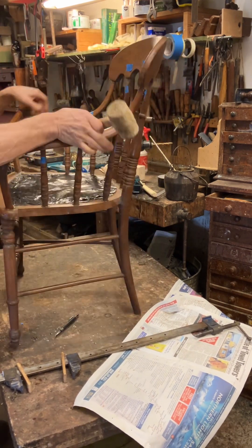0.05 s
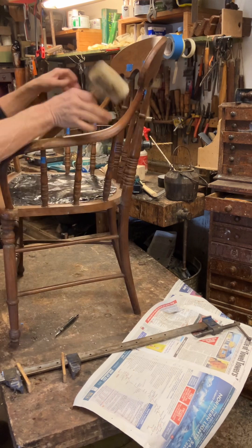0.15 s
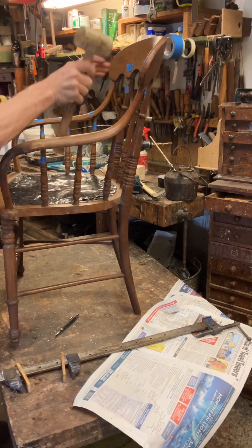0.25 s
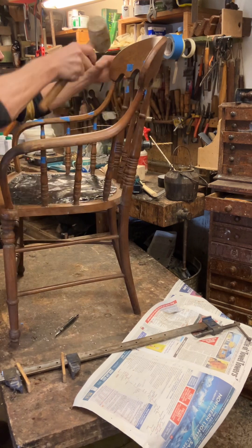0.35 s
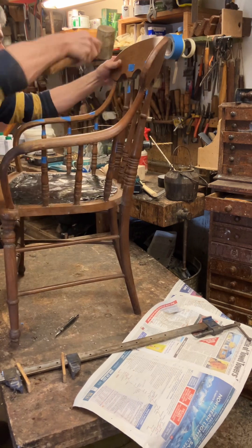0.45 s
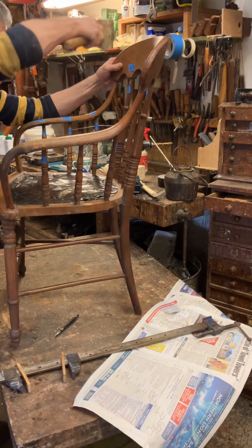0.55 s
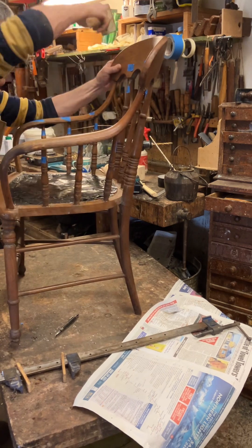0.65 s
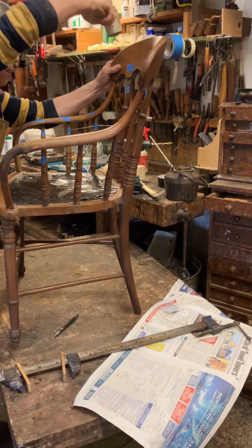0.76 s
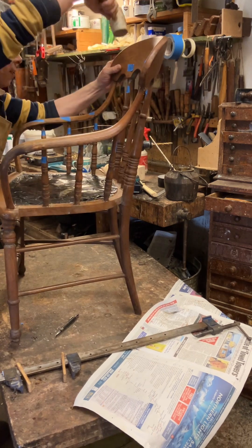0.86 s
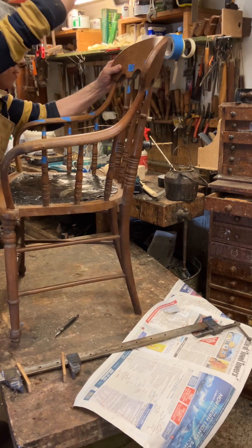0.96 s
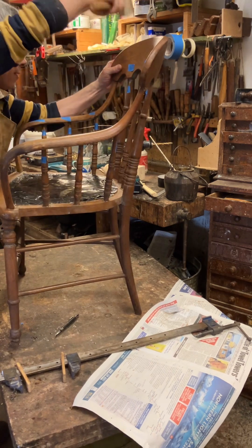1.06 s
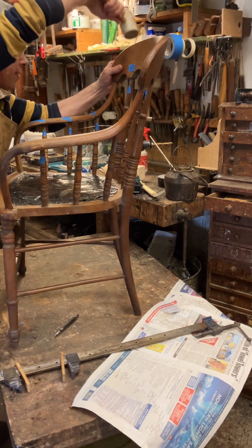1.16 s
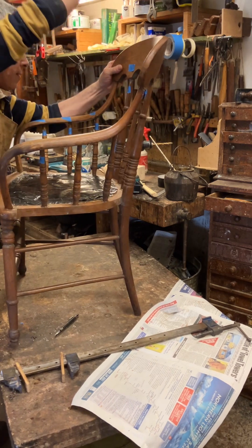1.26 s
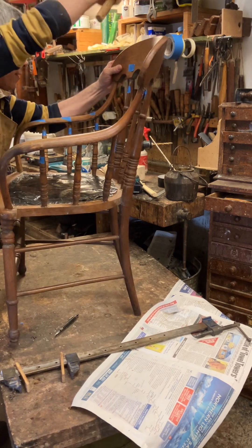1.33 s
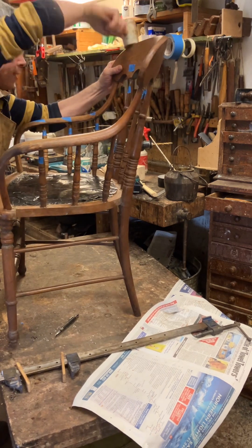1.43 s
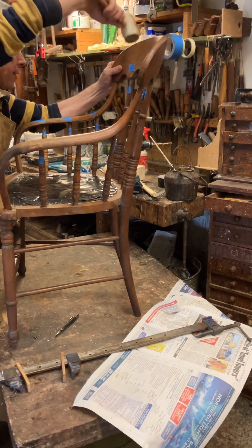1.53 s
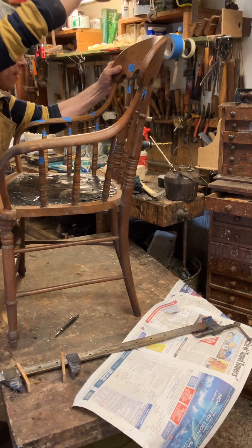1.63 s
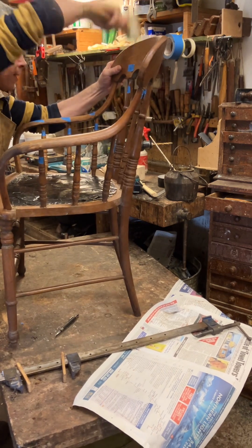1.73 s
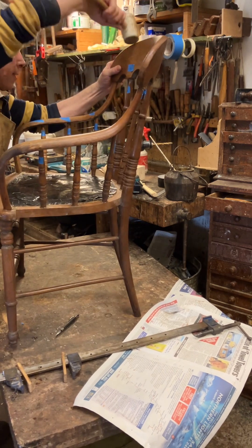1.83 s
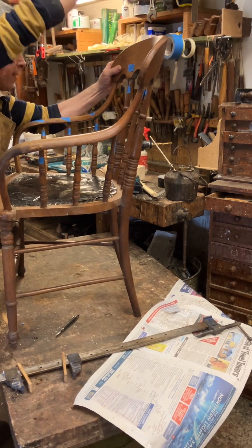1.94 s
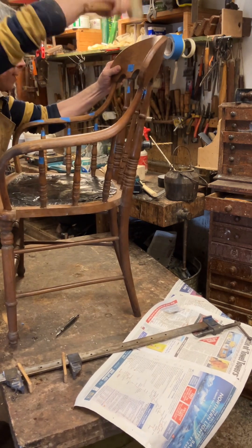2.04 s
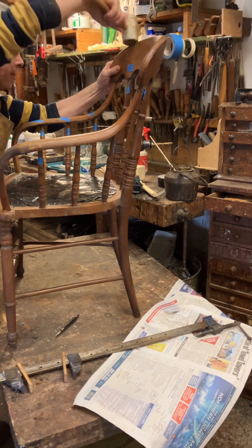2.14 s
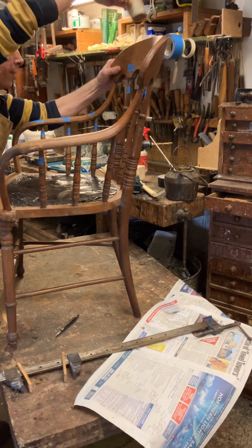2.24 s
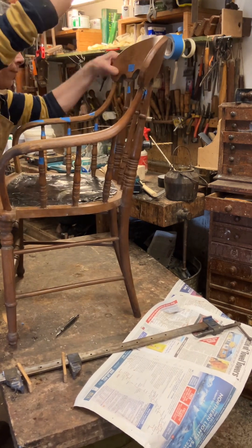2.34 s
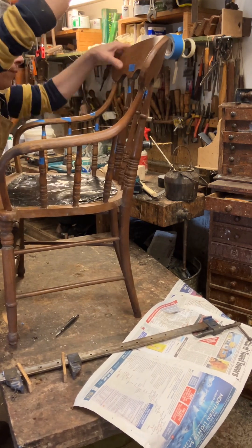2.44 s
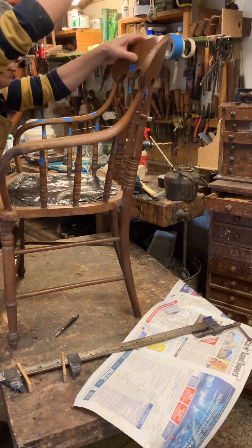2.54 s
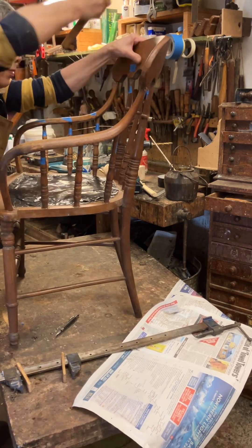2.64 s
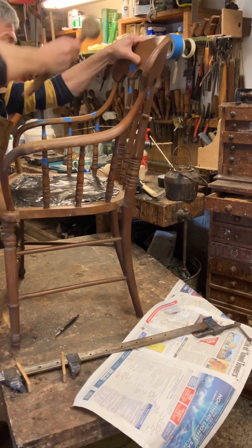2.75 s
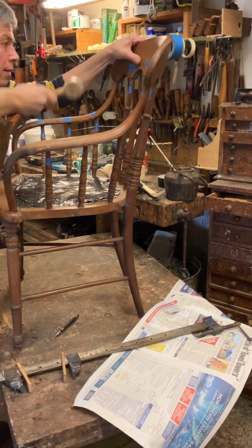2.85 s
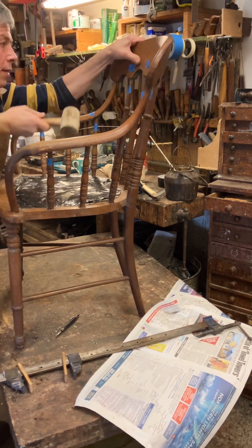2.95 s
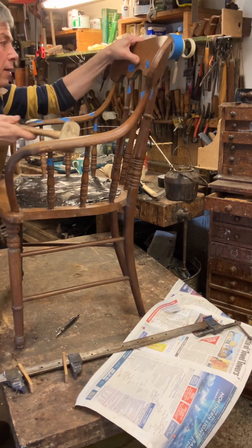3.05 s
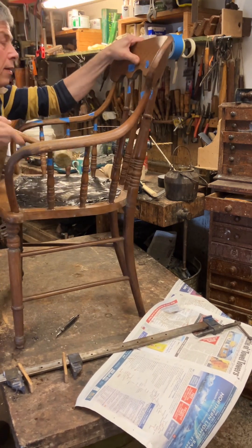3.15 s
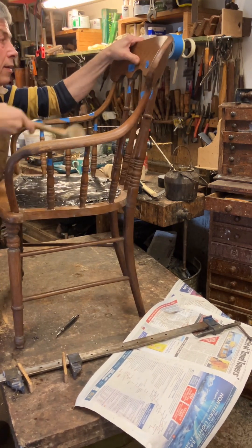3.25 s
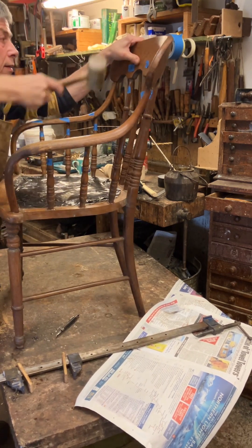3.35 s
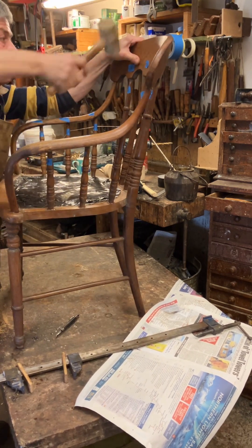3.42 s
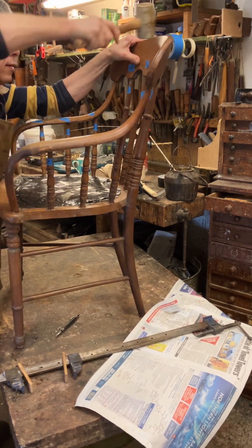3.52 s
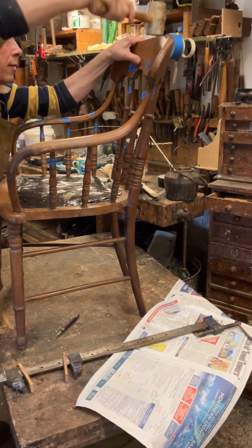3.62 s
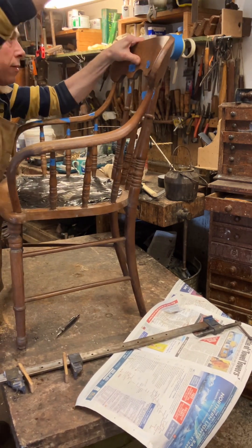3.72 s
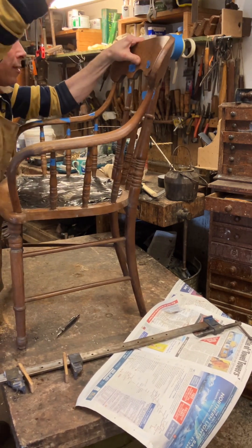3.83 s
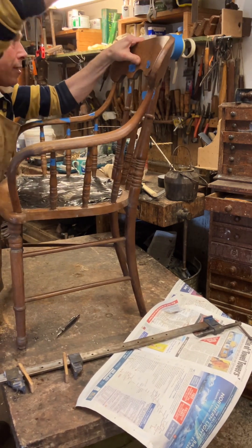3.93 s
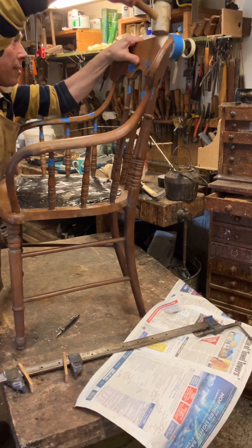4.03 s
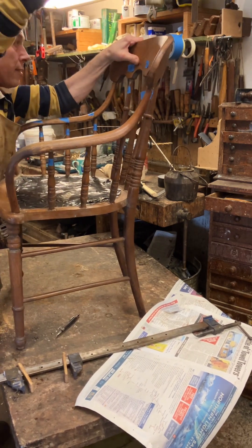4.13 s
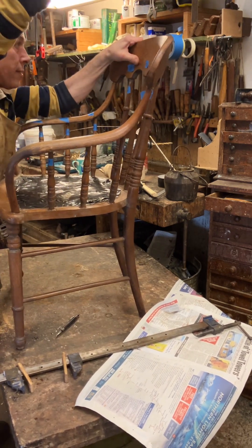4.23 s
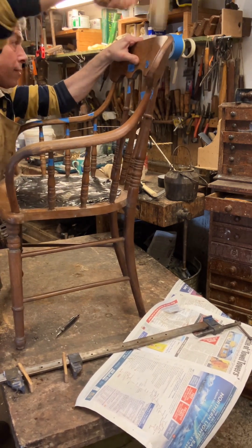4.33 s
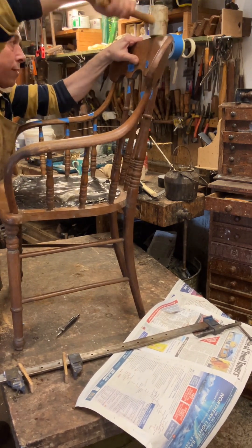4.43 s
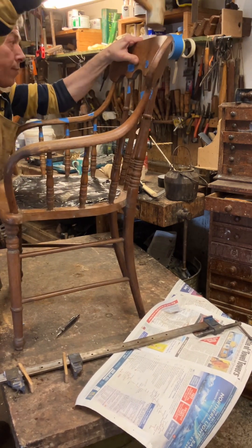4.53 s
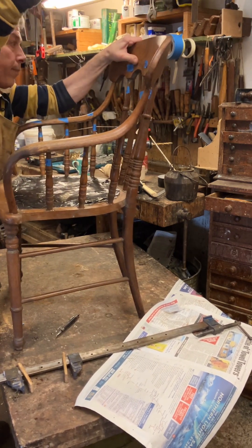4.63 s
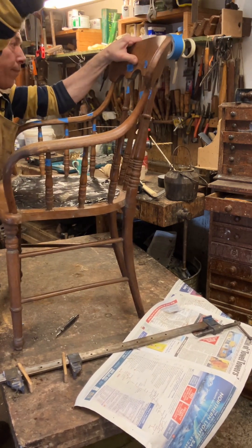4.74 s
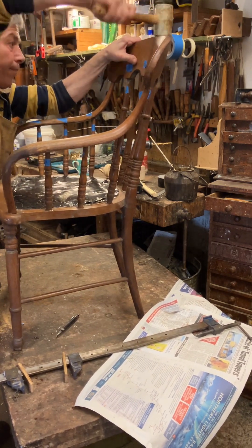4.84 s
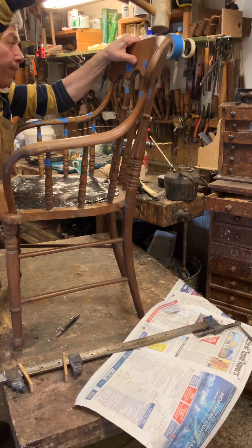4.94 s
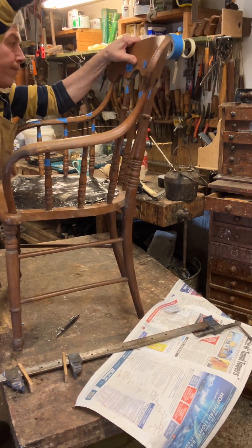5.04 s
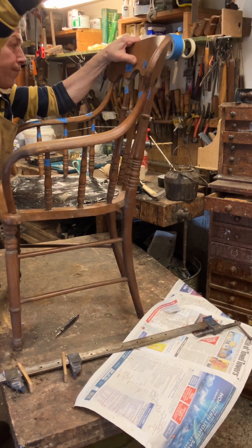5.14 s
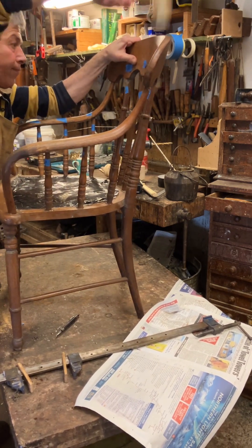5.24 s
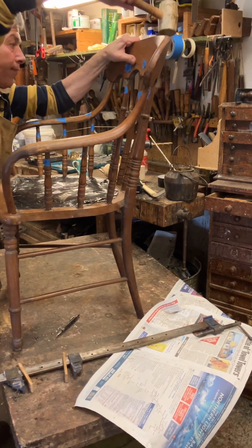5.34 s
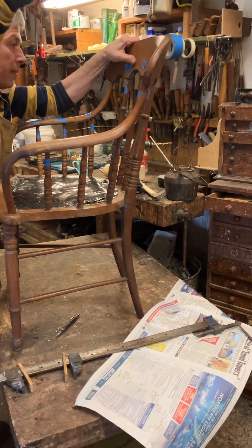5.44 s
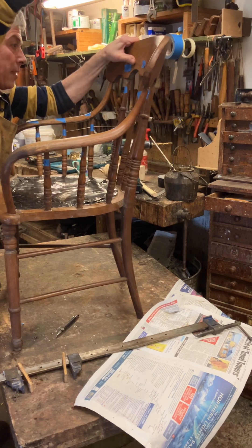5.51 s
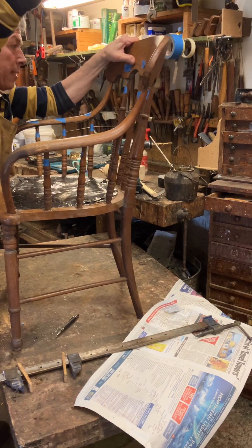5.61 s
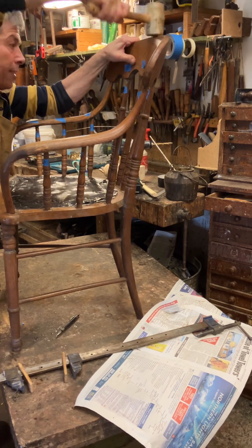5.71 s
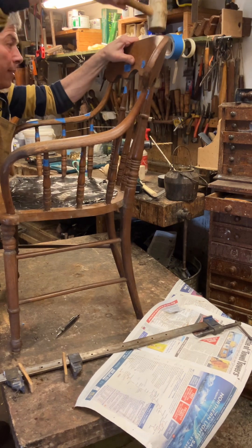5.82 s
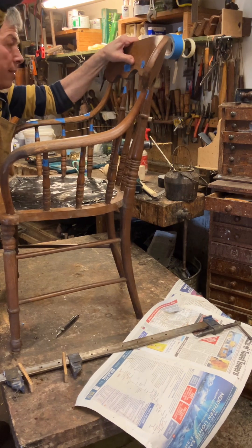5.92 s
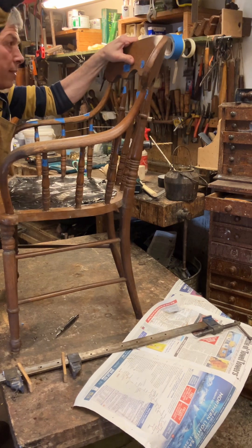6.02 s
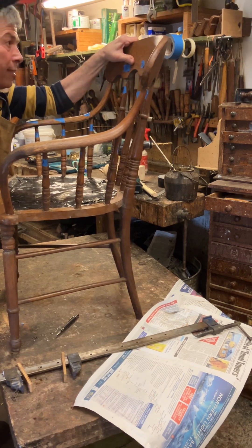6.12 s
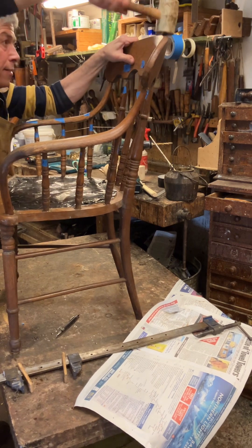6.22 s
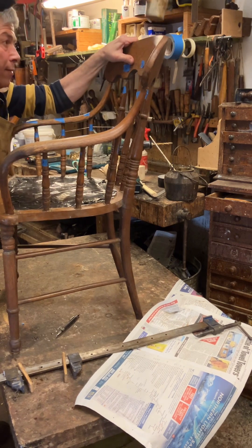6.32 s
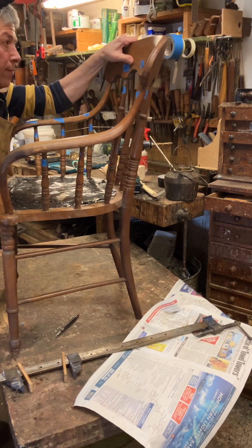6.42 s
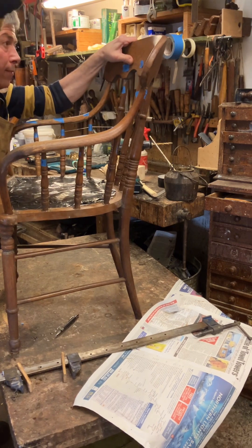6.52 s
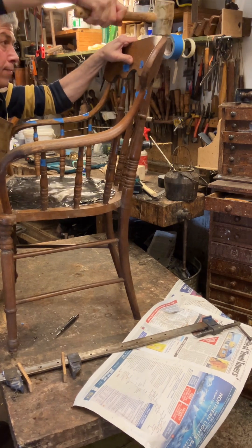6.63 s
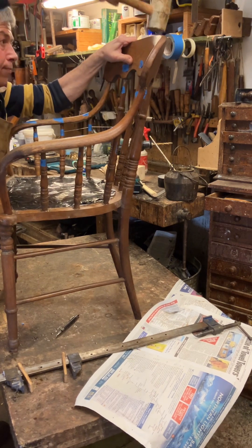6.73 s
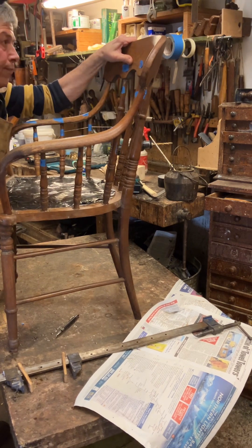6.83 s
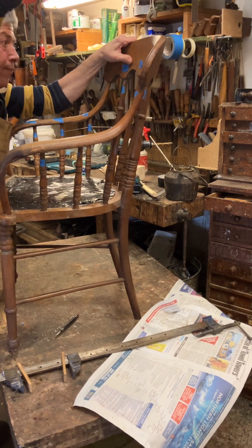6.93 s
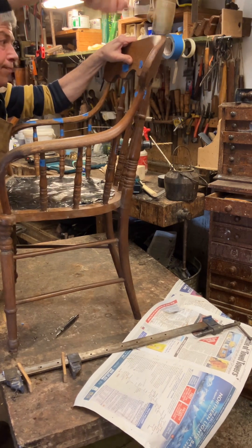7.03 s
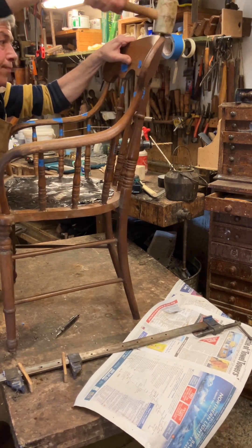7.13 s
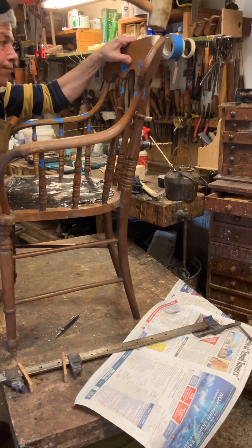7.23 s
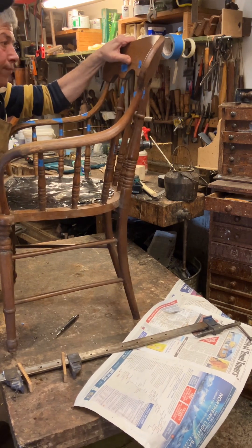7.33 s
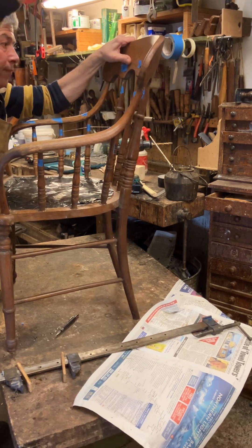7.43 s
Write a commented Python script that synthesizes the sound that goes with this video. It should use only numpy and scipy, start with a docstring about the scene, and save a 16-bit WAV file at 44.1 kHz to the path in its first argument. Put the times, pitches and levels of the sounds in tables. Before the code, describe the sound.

After a faint rustle of sleeves and hands on wood, a wooden mallet strikes a chair frame four times in quick succession, with a brief joint squeak at the last blow. A short pause holds soft shuffling, tiny clicks and one light tap. Eight slower, even blows follow. Each hollow knock buzzes loose spindles, thumps the workbench and rattles metal tools, heard close up in a small workshop.

```python
"""Mallet on a chair back

A wooden mallet knocks on a chair that stands on a workbench in a small, crowded workshop. Each blow
rings the frame, buzzes the loose spindles, booms in the bench and shakes metal tools. In the pauses
sleeves rustle, hands rub on wood and a dry joint squeaks, all over a faint hush."""
import sys
import numpy as np
from scipy import signal
from scipy.fft import rfft, irfft
from scipy.io import wavfile
from scipy.ndimage import uniform_filter1d

SR = 44100
rng = np.random.default_rng(int(sys.argv[2]) if len(sys.argv) > 2 else 0)


def dump(signal):
    """Clip the signal to [-1, 1] and save it as 16-bit WAV at the path in sys.argv[1]."""
    limited = np.clip(np.atleast_2d(signal).T, -1, 1)
    pcm = np.round(limited * 32767).astype(np.int16)
    wavfile.write(sys.argv[1], SR, pcm)


N = 329427

# The low modes of the workbench. Each row: pitch in Hz, level in dB, time to fall 60 dB in seconds.
BENCH = [(83, -8.5, 0.15), (99.35, -4, 0.21), (109.2, -3, 0.23), (157.3, 6.5, 0.12), (165.6, -6, 0.3),
         (182.3, -8, 0.23), (208.8, -9.5, 0.25), (244.4, -3.5, 0.2), (269, -6, 0.14), (307.6, -2, 0.18),
         (347.7, -4, 0.2), (375, -2.5, 0.19), (421.8, -3.5, 0.17)]
# The colour of a dry crack. Each row: frequency in Hz, spectral level in dB.
CRACK = [(1500, 6.5), (3000, -2.5), (4500, -2), (6000, -1.5), (9000, -7), (12000, -9), (15500, -13.5)]


def blows():
    """Mallet hits in four stems: frame knock, crack and tool rattle, close detail, bench boom."""
    # Each row: start in seconds, strength in dB, hardness in dB, crack, tool rattle and thwack in dB,
    # nominal thwack pitch in Hz, thwack hold in seconds, first contact in dB.
    # Crack, rattle, thwack and contact are relative to strength.
    hits = [(1.094, -2.5, 4.5, -19, -33.5, -20.5, 875, .005, -25),
            (1.419, -2.5, 4.5, -15.5, -23.5, -7, 1009, .008, -17),
            (1.742, -2, 1.5, -18, -29, -15.5, 907, 0.0069, -22.5),
            (2.0598, -2, 0, -16.5, -24, -11.5, 869, 0.0068, -22.5),
            (3.576, -31, 12, -18.5, -20.5, -14, 1300, .004, -41.5),
            (3.9647, -2, 2.5, -21, -15, -9, 1010, 0.0048, -29),
            (4.3753, -0.5, -9, -20.5, -17, -13, 983, 0.0055, -33),
            (4.807, -1.5, 5.5, -19, -19.5, -18, 856, 0.0055, -14),
            (5.252, -1.5, -4, -17, -18.5, -15.5, 858, 0.0046, -24),
            (5.7037, -2.5, 3.5, -14.5, -22.5, -14.5, 840, 0.0054, -20),
            (6.16, -4.5, -8.5, -20, -12, -16.5, 797, 0.0072, -21.5),
            (6.604, -4.5, 9, -10.5, -17.5, -9, 1100, 0.0045, -3.5),
            (7.0684, -1.5, -0.5, -16.5, -18, -13, 1180, 0.0079, -19.5)]
    wood, air, near, boom = np.zeros((4, N))
    slips = dict(rough_db=3, rise_s=.0009)  # the joint gives in several small slips
    boom_follows = .61  # the bench follows strength only in part: light blows sound boomier
    for start, db, hard_db, crack_db, rattle_db, thwack_db, hz, hold_s, contact_db in hits:
        contact = burst(.002)
        contact *= attack(np.arange(len(contact)) / SR, .0005)
        add(near, start, gain_of(db + contact_db) * contact)
        body_start = start + .0015  # the wood answers just after the first contact
        add(wood, body_start, gain_of(db - 6.5) * frame_knock(hard_db))
        add(near, body_start, gain_of(db + thwack_db) * thwack(hz, hold_s, fall_s=.00614))
        add(air, body_start, gain_of(db + crack_db) * burst(.0047, **slips))
        add(near, body_start, gain_of(db + crack_db + 1) * burst(.0052, **slips))  # close, dry snap
        add(near, body_start, gain_of(db - 26.5) * spindle_buzz())
        bench_start = start + .003976  # the blow travels down the legs
        add(boom, bench_start, gain_of(boom_follows * db - 19.5) * bench_boom())
        add(air, start + .012, gain_of(db + rattle_db) * tool_rattle())
    return wood, air, near, boom


def frame_knock(hard_db):
    """The chair frame rings briefly; a harder contact reaches the upper modes."""
    # The modes of the frame. Each row: pitch in Hz, level in dB.
    chair = [(455, -4.5), (500, 3), (590, 2), (690, 3), (785, 3), (890, 2), (1040, -1.5), (1180, -0.5),
             (1370, -7.5), (1575, -6), (1800, -12), (1980, -4.5), (2200, 1.5), (2420, 2.5), (2700, -3.5),
             (3000, -18.5), (3400, -26), (3900, -4), (4400, -17)]
    ring_cycles = 10  # wood loses 60 dB in this many cycles
    modes = [(hz, db, ring_cycles / hz) for hz, db in chair]
    upper = np.clip(np.log2(np.array(chair)[:, :1] / 700), 0, 1)
    knock = ring(modes, spread_db=1, detune=.015, lift_db=upper * hard_db)
    return knock * attack(np.arange(len(knock)) / SR, .0008)


def thwack(hz, hold_s, fall_s):
    """Bending waves in the rail: the highs arrive first, so the pitch dives within a few cycles."""
    # Levels of harmonics 2 to 4 in dB against the fundamental.
    overtones_db = [-8, -13, -17]
    t = np.arange(2000) / SR
    phase = 2 * np.pi * np.cumsum(hz * (.5 + .892 * np.exp(-t / fall_s))) / SR
    wave = np.sin(phase)
    for harmonic, db in enumerate(overtones_db, 2):
        wave += gain_of(db) * np.sin(harmonic * phase + 2 * np.pi * rng.random())
    uneven = 1 + .3 * wander(len(t), 40)
    release = np.exp(-np.maximum(t - hold_s, 0) / .002)
    return wave * uneven * attack(t, .0007) * release


def burst(fall_s, size=2048, rough_db=0, rise_s=1e-5):
    """A crack of many tiny contacts: short, uneven and dying, with a smooth colour."""
    t = np.arange(size) / SR
    colour = gain_of(read(CRACK, np.fft.rfftfreq(size, 1 / SR)))
    uneven = gain_of(rough_db * wander(size, 40))
    fade = np.exp(-t / fall_s) * attack(t, rise_s)
    crack = rng.standard_normal(size)
    for _ in range(6):  # impose envelope and colour in turn: no holes or peaks in the spectrum
        phase = np.angle(rfft(crack * fade * uneven))
        crack = evened(irfft(colour * np.exp(1j * phase), size))
    crack *= t < fall_s * np.log(1000)  # gate where the fade is 60 dB down
    return crack * np.linalg.norm(fade) / np.linalg.norm(crack)


def spindle_buzz():
    """Thin spindles and rungs ring on after the frame, rough because they sit loose in their holes."""
    # Each row: pitch in Hz, level in dB, time to fall 60 dB in seconds.
    spindles = [(484, 2, .2), (715, -1, .3), (775, 0, .42), (888, -2, .35), (980, -4, .42), (1044, -1, .3),
                (1150, -4, .45), (1185, -5, .3), (1370, -7, .25), (1575, -11, .2), (2410, -14, .22),
                (4357, -16, .35)]
    tone = ring(spindles, spread_db=1.4, detune=.0021)
    buzz = gain_of(5 * (wander(len(tone), 500) - 1))
    return tone * buzz * attack(np.arange(len(tone)) / SR, .0014)


def bench_boom():
    """The bench takes the blow: its low modes swell in and die away."""
    boom = ring(BENCH, spread_db=1, detune=.0038)
    return boom * attack(np.arange(len(boom)) / SR, .0025) ** 2


def tool_rattle():
    """Loose metal tools knock together: a clatter with a flickering jingle under it."""
    # The modes of the tools. Each row: pitch in Hz, level in dB, time to fall 60 dB in seconds.
    tools = [(3290, -6, .025), (3900, -2, .025), (4357, -9, .06), (4640, -5, .025), (6230, 6, .01),
             (6720, -4, .02), (7600, -3, .015), (8520, -4, .02), (8950, -3, .015), (9320, -8, .04),
             (13415, -6, .06), (14500, -12, .03)]
    jingle = ring(tools, spread_db=2.5, detune=.003)
    t = np.arange(len(jingle)) / SR
    rattle = jingle * gain_of(3 * wander(len(t), 250) - 12)
    add(rattle, 0, burst(.0067, rough_db=4))
    return rattle * attack(t, .003)


def squeaks():
    """Fast, uneven stick-slip in a dry joint: a high tone that sags, then steps up late."""
    # Each row: start and length in seconds, pitch in Hz, opening and closing level in dB,
    # late step up and wobble as shares of the pitch.
    creaks = [(0, 0.12, 3700, -59.5, -76, 0.012, 0.019), (1.898, 0.175, 3658, -42.5, -33, 0.039, 0.0059)]
    # Levels of harmonics 2 to 4 in dB against the fundamental.
    overtones_db = [-24, -24, -29]
    sag, step_at, step_width = .055, .72, .025  # share of pitch per length; two shares of length
    out = np.zeros(N)
    for start, length, top_hz, from_db, to_db, step, wobble in creaks:
        progress = np.arange(0, length, 1 / SR) / length
        size = len(progress)
        step_up = step / (1 + np.exp((step_at - progress) / step_width))
        hz = top_hz * (1 - sag * np.minimum(progress, step_at) + step_up)
        phase = 2 * np.pi * np.cumsum(hz * (1 + wobble * wander(size, 150))) / SR
        tone = np.sin(phase) + sum(gain_of(db) * np.sin(k * phase) for k, db in enumerate(overtones_db, 2))
        level_db = from_db + (to_db - from_db) * progress + 2.2 * wander(size, 150)
        add(out, start, gain_of(level_db) * tone * signal.windows.tukey(size, .1))
    return out


def bumps():
    """Soft contact with the bench: only its low modes speak."""
    # Each row: start in seconds, strength in dB, tilt above 170 Hz in dB per octave.
    nudges = [(0, -48.5, -13), (0.489, -40.5, -7.5)]
    out, t = np.zeros(N), np.arange(SR // 2) / SR
    octaves = np.maximum(np.log2(np.array(BENCH)[:, :1] / 170), 0)
    for start, db, tilt_db in nudges:
        thud = ring(BENCH, spread_db=1.58, detune=.012, lift_db=tilt_db * octaves)
        add(out, start, gain_of(db) * thud * attack(t, .0006))
    return out


def ticks():
    """Tiny dry snaps: a pinch of tone in a puff of noise."""
    # Each row: start in seconds, level in dB, pitch in Hz.
    snaps = [(1.029, -75, 14700), (2.4613, -47, 7860), (2.6797, -57.5, 8700), (2.835, -49, 4300)]
    out, t = np.zeros(N), np.arange(400) / SR
    for start, db, hz in snaps:
        snap = .35 * np.sin(2 * np.pi * hz * t) + .82 * noise(CRACK, len(t))[0]
        add(out, start, gain_of(db) * snap * attack(t, .0003) * np.exp(-t / .0028))
    return out


def rustles():
    """Hands and sleeves moving: a low shuffle, a grainy hiss and a finer fizz."""
    # Each row: start and hold in seconds, then shuffle, cloth hiss and fizz levels in dB.
    moves = [(0, 0.031, -62.5, -76, -100), (0.24, 0.1, -77, -78, -100), (0.378, 0.067, -65, -72.5, -94),
             (0.465, 0.056, -61, -68.5, -74), (0.615, 0.28, -64, -70, -80), (0.934, 0.27, -67, -86, -94),
             (2.706, 0.096, -73, -80.5, -97), (2.834, 0.12, -62, -70, -90),
             (2.993, 0.075, -73, -65.5, -66.5), (3.119, 0.055, -74, -73, -83),
             (3.178, 0.057, -73, -89, -95)]
    # The colours of rubbed wood, cloth and fine fizz. Each row: frequency in Hz, spectral level in dB.
    shuffle = [(50, 1.5), (150, 2), (300, 1), (450, 2), (700, -3), (1200, -8.5), (1500, -4.5), (1700, -5),
               (1950, -6.5), (2150, -9), (2350, -5), (2700, -12.5), (5000, -26)]
    cloth = [(1000, -14.5), (2500, -1.5), (6000, 0), (9000, -7.5), (12000, -12), (15500, -25.5)]
    fizz = [(5000, -21.5), (8000, -1), (11000, 3.5), (15500, -15)]
    swell_db_per_s, fade_db_per_s = 290, 224  # before and after the hold
    t, power = np.arange(N) / SR, np.zeros((3, N))
    grain, uneven = gain_of(1.5 * wander(N, 300)), gain_of(2.5 * wander(N, 900))
    layers = [texture * noise(colour, N, channels=2)
              for texture, colour in ((uneven, shuffle), (grain, cloth), (grain, fizz))]
    for start, hold, *levels_db in moves:
        slopes_db = np.minimum(swell_db_per_s * (t - start), fade_db_per_s * (start + hold - t))
        power += np.outer(gain_of(levels_db), gain_of(np.minimum(slopes_db, 0))) ** 2
    return sum(layer * level for layer, level in zip(layers, np.sqrt(power)))


def rubs():
    """A hand or the mallet rubs the wood: friction makes one resonance sing a breathy note."""
    # Each row: start and length in seconds, pitch in Hz, level in dB.
    strokes = [(.67, .12, 1560, -71), (.70, .1, 2300, -67), (.69, .08, 2890, -76), (.81, .1, 1940, -67),
               (.78, .06, 720, -68), (.88, .08, 540, -69), (.93, .13, 1800, -72), (.96, .12, 330, -66),
               (2.62, .05, 1150, -78), (2.66, .15, 1900, -76), (2.86, .1, 2050, -76), (3.14, .14, 530, -75),
               (3.18, .1, 780, -77), (3.17, .12, 323, -74)]
    out, width_hz = np.zeros(N), 55
    pole = np.exp(-np.pi * width_hz / SR)
    for start, length, hz, db in strokes:
        t = np.arange(0, length, 1 / SR)
        real, imaginary = rng.standard_normal((2, len(t)))
        waver = signal.lfilter([1], [1, -pole], real + 1j * imaginary)
        note = (waver * np.exp(2j * np.pi * hz * t)).real
        add(out, start, gain_of(db) * evened(note) * signal.windows.tukey(len(t), .5))
    return out


def workshop(frame, spot):
    """Dense room echoes, unlike for frame and struck spot, slowly changing in colour."""
    # The decay of the room. Each row: frequency in Hz, time to fall 60 dB in seconds.
    room = [(100, 0.5), (300, 0.43), (700, 0.44), (1100, 0.46), (1500, 0.42), (3000, 0.48), (7000, 0.41),
            (11000, 0.34), (14000, 0.2), (16000, 0.07)]
    out, drift = np.zeros((2, N)), 1.4 * np.arange(N) / SR  # drift in radians
    predelay, spacing = 90, 12  # samples
    slots = np.arange(predelay, SR - spacing, spacing)
    build_up = attack(np.maximum(np.arange(SR) - predelay, 0) / SR, .0015)
    for k in range(3):  # three echo patterns, crossfaded at constant power
        taps = np.zeros((2, SR))
        arrivals = slots + rng.integers(0, spacing, (2, len(slots)))
        np.put_along_axis(taps, arrivals, rng.choice([-1., 1.], arrivals.shape), 1)
        # Even out the spectrum so no pitch sticks out of the echo.
        phase = np.angle(signal.stft(taps, nperseg=1024)[2])
        taps = signal.istft(np.exp(1j * phase), nperseg=1024)[1]
        hz, t, bands = signal.stft(taps, SR, nperseg=256)
        decay = gain_of(-60 * t / read(room, hz)[:, None])
        tail = signal.istft(bands * decay, SR, nperseg=256)[1][:, :SR] * build_up
        turn = drift + k * np.pi / 3
        send = np.sqrt(2 / 3) * (np.cos(turn) * frame + np.sin(turn) * spot)
        out += signal.fftconvolve(send[None], tail / np.linalg.norm(tail[0]), axes=1)[:, :N]
    return out


def hush():
    """Room tone: a faint, steady rumble with a trace of hiss."""
    # Each row: frequency in Hz, spectral level in dB.
    colour = [(30, 3.5), (55, 9.5), (100, -8), (200, -17), (350, -19.5), (800, -20.5), (3000, -24),
              (8000, -26), (13000, -36.5), (15500, -43.5)]
    return gain_of(-68.5) * noise(colour, N, channels=2)


def ring(modes, spread_db, detune, lift_db=0):
    """Dying modes, neighbours opposed; each blow lands elsewhere and excites them differently."""
    hz, db, t60 = np.transpose(modes)[:, :, None]
    level_scatter, pitch_scatter = rng.standard_normal((2, len(modes), 1))
    t = np.arange(SR // 2) / SR
    polarity = (-1.) ** np.arange(len(modes))[:, None]
    level = gain_of(db + lift_db + spread_db * level_scatter - 60 * t / t60)
    return (polarity * level * np.sin(2 * np.pi * hz * (1 + detune * pitch_scatter) * t)).sum(0)


def noise(spectrum, size, channels=1):
    """Noise of the given colour, rms 1."""
    colour = gain_of(read(spectrum, np.fft.rfftfreq(size, 1 / SR)))
    return evened(irfft(rfft(rng.standard_normal((channels, size))) * colour, size))


def wander(size, span):
    """Random modulation smoothed over span samples, rms 1."""
    return evened(uniform_filter1d(rng.standard_normal(size), span))


def attack(t, rise_s):
    """An exponential fade-in."""
    return 1 - np.exp(-t / rise_s)


def gain_of(db):
    """Decibels to a factor."""
    return 10 ** (np.asarray(db) / 20)


def evened(x):
    """Scales to rms 1."""
    return x / np.sqrt(np.mean(x ** 2) + 1e-20)


def read(points, hz):
    """Reads a table on a log-frequency axis."""
    f, value = np.transpose(points)
    return np.interp(np.log(hz + 1), np.log(f + 1), value)


def add(mix, start, sound):
    """Mixes a sound in at start seconds."""
    part = mix[max(round(start * SR), 0):][:len(sound)]
    part += sound[:len(part)]


def scene():
    """The stereo mix: the direct sound reaches the second microphone a little later, the echoes differ."""
    wood, air, near, boom = blows()
    boom += bumps()
    small_sounds = squeaks() + ticks() + rubs()
    direct = gain_of(4) * (wood + air) + near + boom + small_sounds
    frame_send = gain_of(5) * wood + gain_of(-14) * small_sounds
    spot_send = gain_of(10) * air + gain_of(-10) * near + gain_of(-2) * boom
    return np.array([direct, np.roll(direct, 9)]) + workshop(frame_send, spot_send) + rustles() + hush()


def record(dry):
    """Close microphones: bass alike, middle mostly unrelated, treble slipping in phase; soft overload."""
    # How alike the two channels are. Each row: frequency in Hz, likeness from 0 to 1.
    likeness = [(30, .9), (70, .997), (170, .996), (300, .88), (500, .36), (900, .35), (2500, .15),
                (3600, .2), (4700, .7), (5400, .88), (7500, .97), (15000, .97)]
    # Small capsules lose both ends of the range. Each row: frequency in Hz, gain in dB.
    capsule = [(25, -12.5), (50, -8.5), (85, 3.5), (15600, 2), (16200, -29.5)]
    in_step_hz, cycle_hz, cutoff_hz = 8400, 6350, 16950
    hz = np.fft.rfftfreq(N, 1 / SR)
    same = np.clip(read(likeness, hz), 0, 1)
    turn = 2 * np.pi * (hz - in_step_hz) / cycle_hz
    slip = np.minimum(.42 * np.sin(2 * turn) - turn - 2 * np.pi, 0)  # lingers in step and opposed
    left, other = rfft(dry) * gain_of(read(capsule, hz))
    right = same * left * np.exp(1j * slip) + np.sqrt(1 - same ** 2) * other
    pair = irfft(np.array([left, right]), N)
    saturated = pair / (1 + pair ** 4) ** .25
    lowpass = signal.firwin(511, cutoff_hz, window=("kaiser", 9), fs=SR)
    return signal.oaconvolve(saturated, lowpass[None], "same")


dry = scene()
out = record(dry)
dump(out)
```